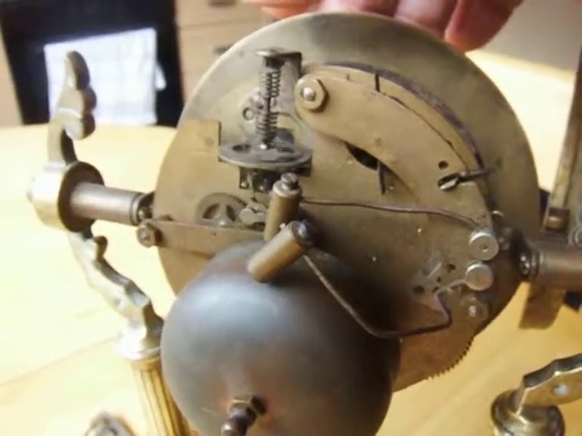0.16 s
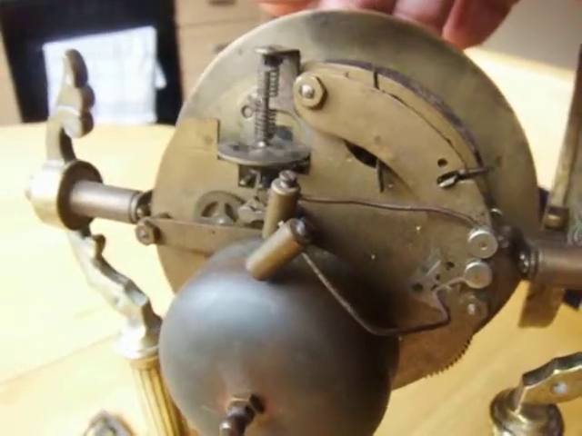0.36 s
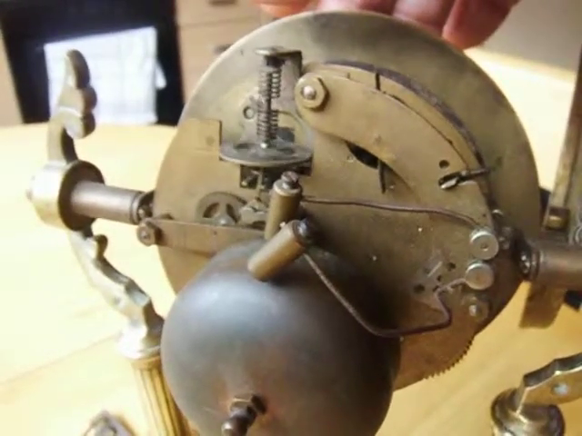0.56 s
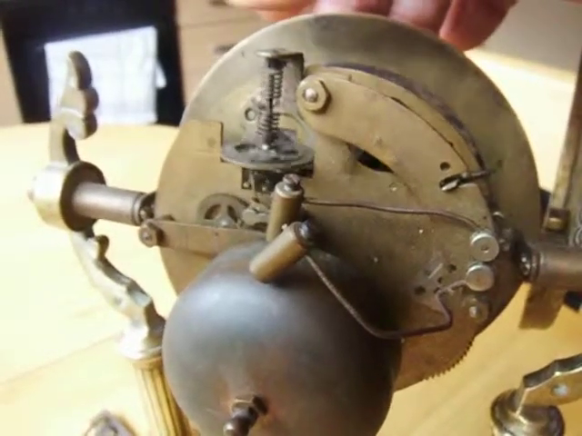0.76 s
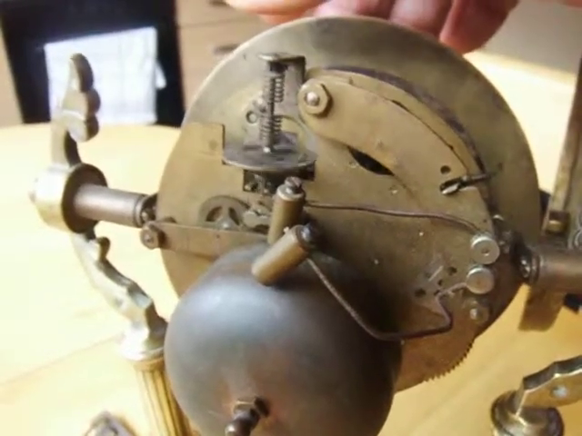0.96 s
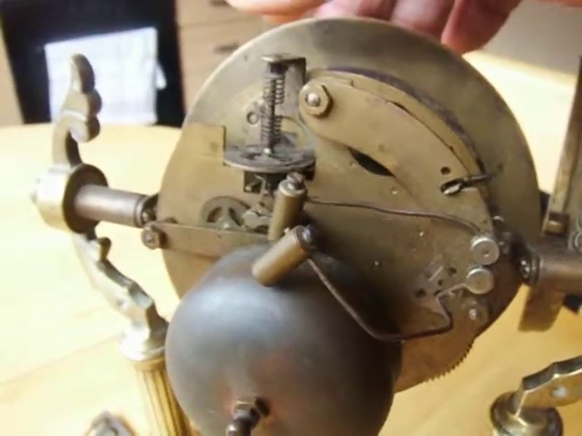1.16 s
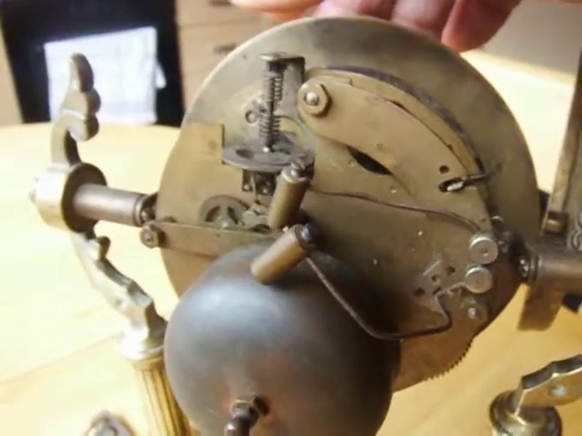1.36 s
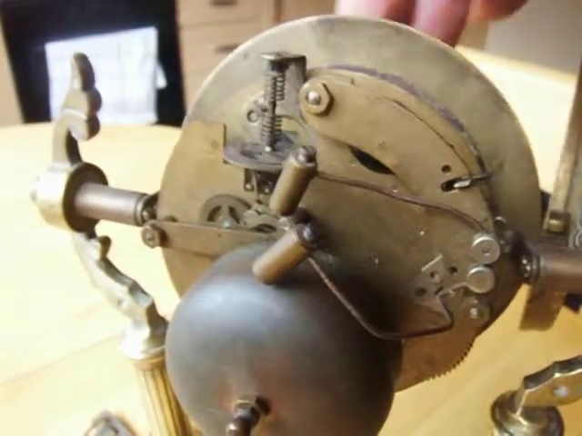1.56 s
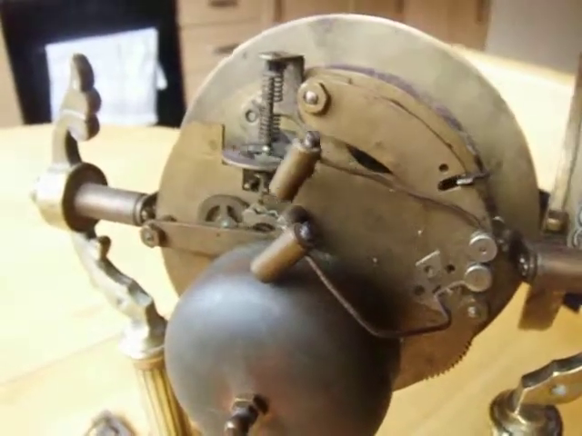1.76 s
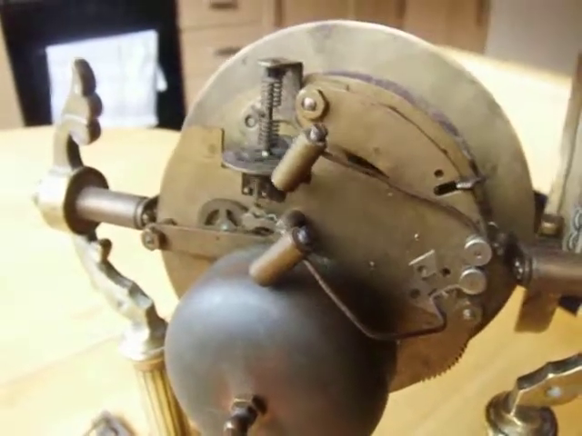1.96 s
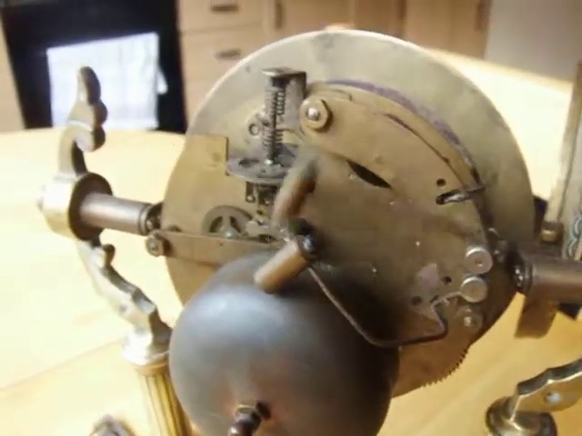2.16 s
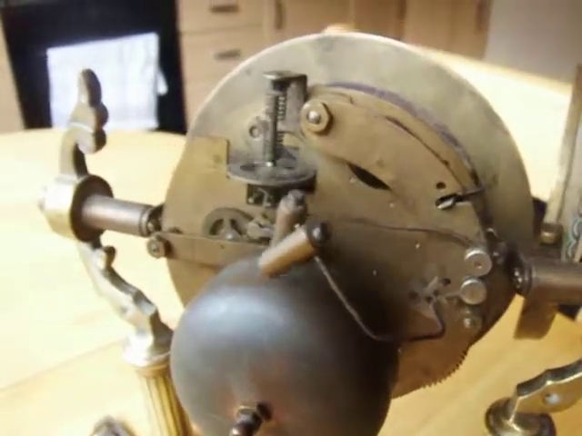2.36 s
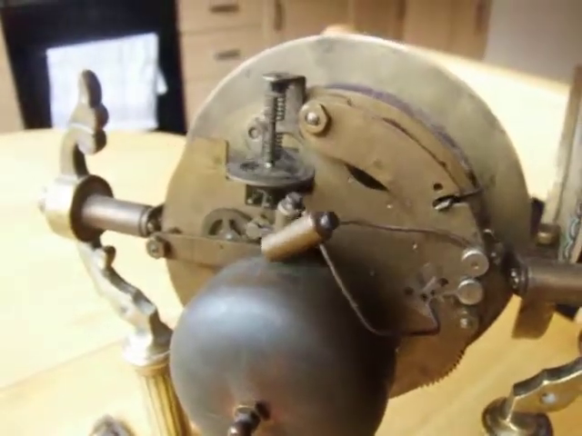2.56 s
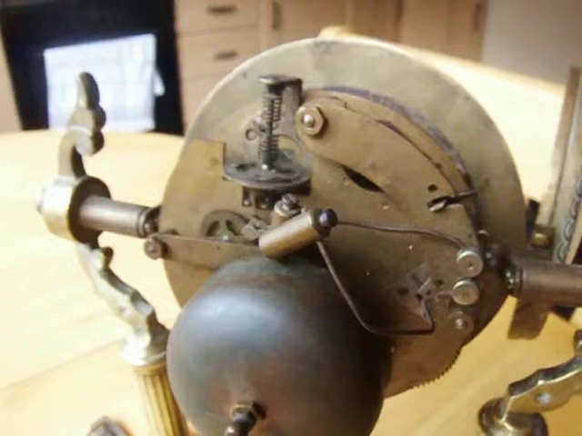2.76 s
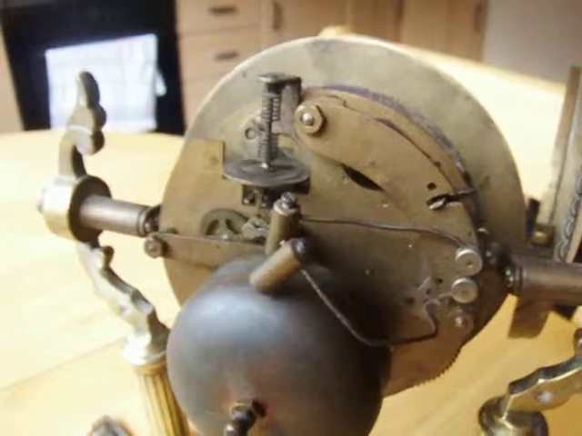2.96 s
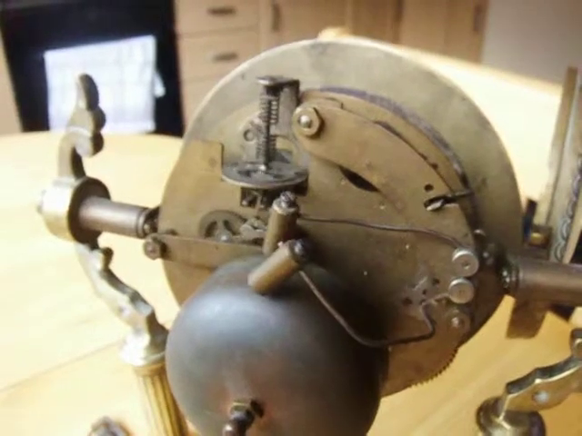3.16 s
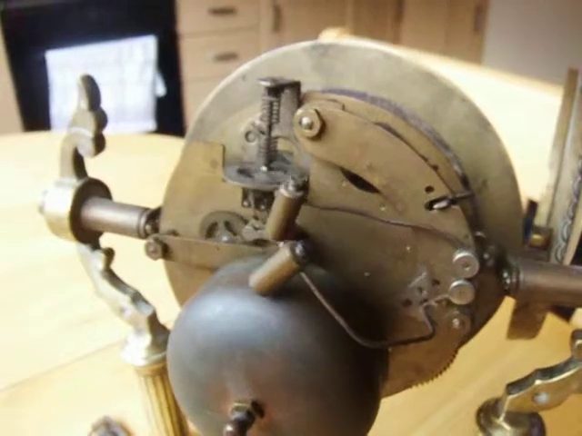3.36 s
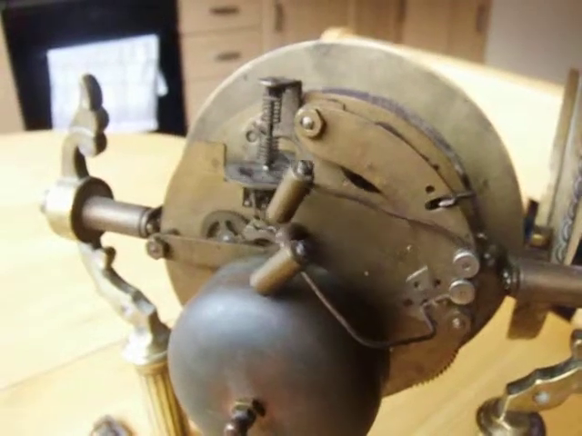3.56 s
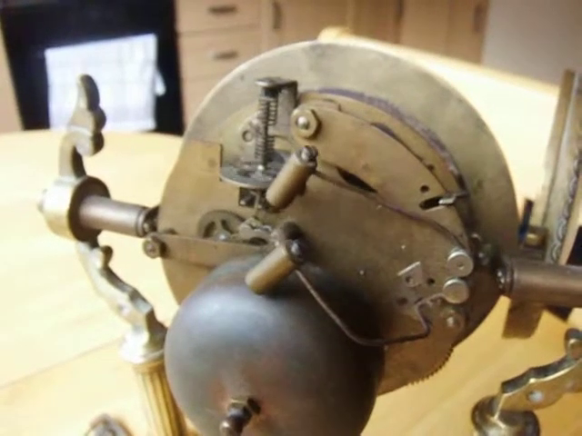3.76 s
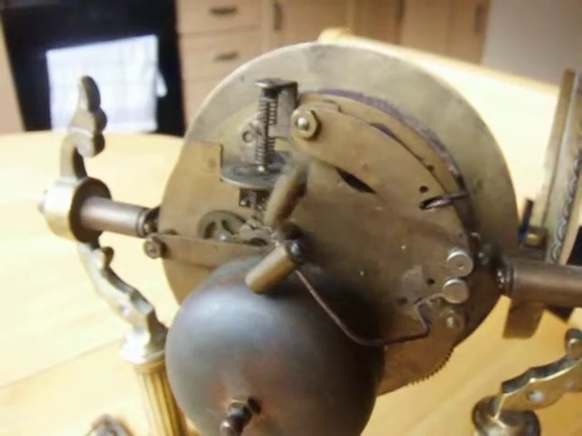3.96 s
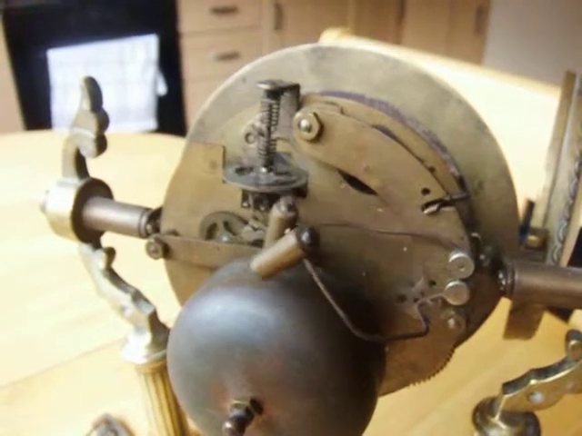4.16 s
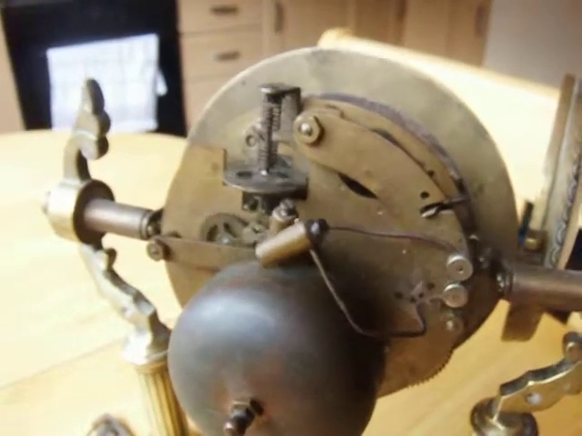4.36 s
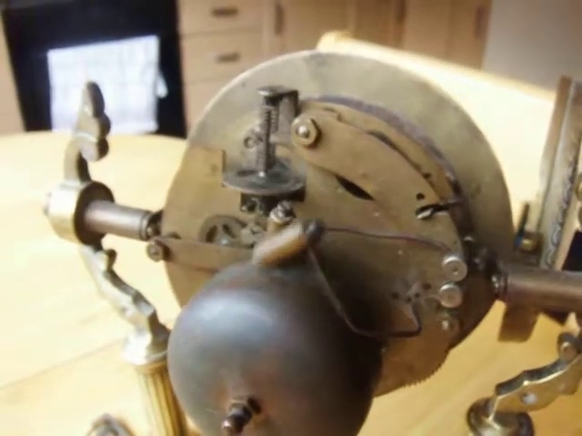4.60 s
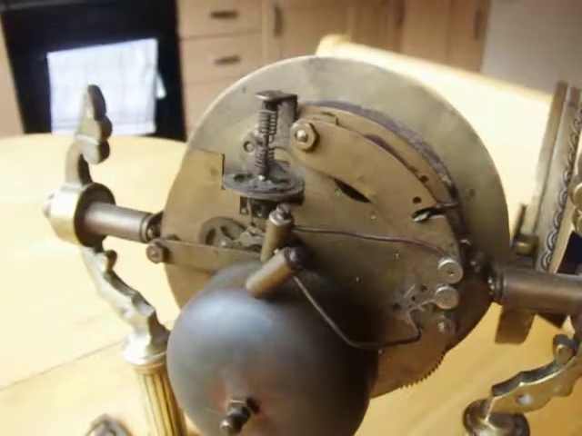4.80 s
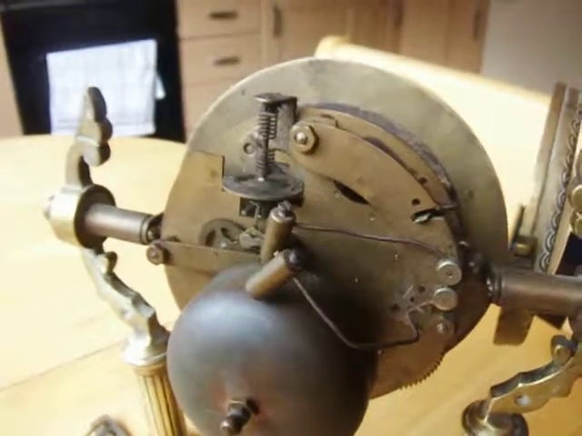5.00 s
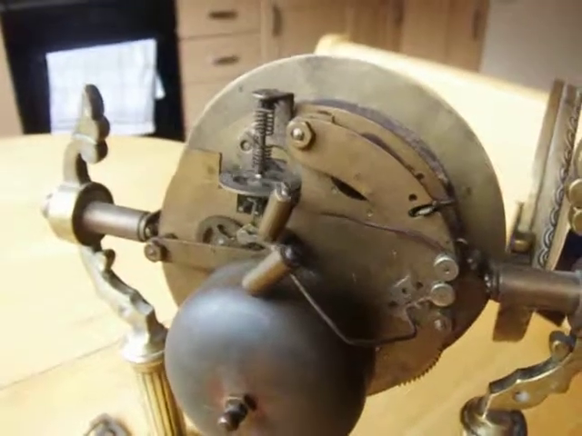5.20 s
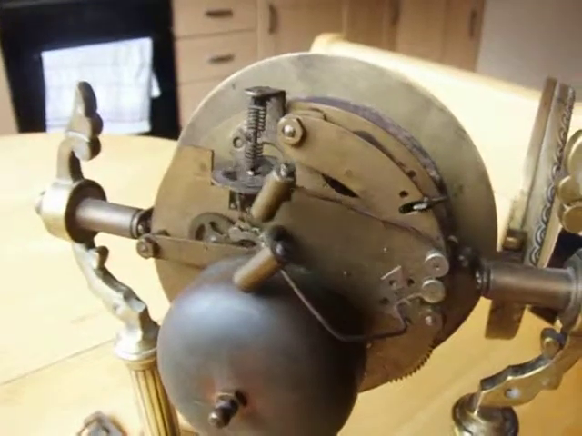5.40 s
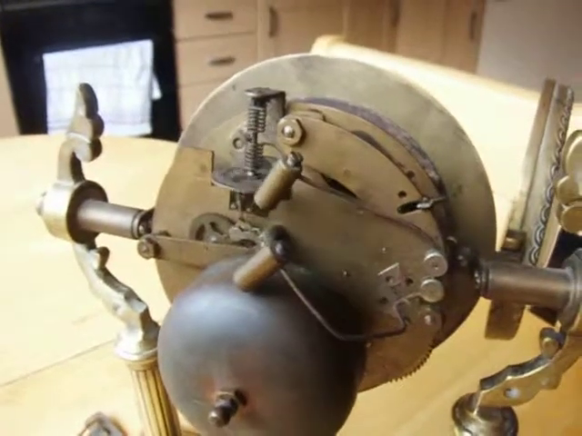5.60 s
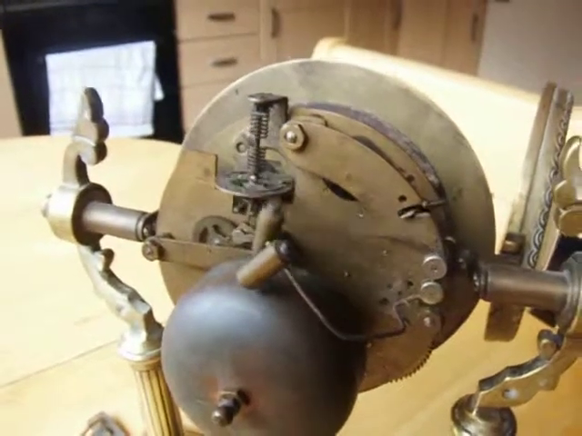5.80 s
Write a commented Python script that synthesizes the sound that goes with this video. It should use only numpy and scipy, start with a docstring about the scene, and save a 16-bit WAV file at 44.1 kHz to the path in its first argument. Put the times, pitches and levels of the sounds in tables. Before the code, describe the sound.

Close up in a small room, a bare clock movement is released: a few dry metallic snaps, then ticking teeth quicken into a steady raspy whirr. From about two seconds two hammers strike two nested bells alternately, five clangs in all, with long beating rings and rattling hammer bounces. A cheap small camera microphone adds low murmur, faint hum, gritty distortion and gain that pumps down after the blows.

```python
"""A room with a striking clock: levers snap, the train is let go and speeds up to a whirr of teeth.
Two hammers strike two nested bells in turn: decaying sine modes, with noise and short knocks at each blow.
The whirr is noise and tiny ticks rung through a plate; each tooth lands with a tick, the outer hammer chatters.
A small camera with a faint hum of its own hears it through gain control and a roughly 8-bit converter
at a quarter of the sample rate."""
import sys
import numpy as np
from scipy import signal
from scipy.fft import rfft, irfft
from scipy.io import wavfile
from scipy.ndimage import uniform_filter1d

SR = 44100
rng = np.random.default_rng(int(sys.argv[2]) if len(sys.argv) > 2 else 0)


def unload_audio(sound):
    """Save the sound as a 16-bit wav file, at the path given as the first command line argument."""
    columns = np.transpose(np.atleast_2d(sound))
    # keep every value between -1 and 1, then stretch to whole-number steps
    steps = np.round(np.clip(columns, -1, 1) * 32767)
    wavfile.write(sys.argv[1], SR, steps.astype(np.int16))


def gain_from_db(level_db):
    """Convert decibel levels to linear amplitude factors (20 dB per decade)."""
    decades = np.asarray(level_db, float) / 20
    return 10 ** decades


N = 257544

# moments of the hammer blows on each bell: (time [s])
OUTER_BLOW_S = [2.2038, 4.0035, 5.7642]
INNER_BLOW_S = [2.8484, 4.6461]
# whirr before the blows shake it, with a lull while the first hammer is lifted: (time [s], level [dB])
WHIRR_LEVEL = [(.9, -58), (.99, -43), (1.4, -45.5), (1.82, -43.5), (1.851, -56.5), (1.91, -49.5),
               (1.93, -45.5), (2.19, -45), (2.3, -35.5), (3.5, -39), (5.84, -39)]
WHIRR_START_S = WHIRR_LEVEL[0][0]


def evened(x):
    """Scales to rms 1."""
    return x / np.sqrt(np.mean(x ** 2) + 1e-20)


def add(mix, s, sound):
    """Mixes a sound in at time s."""
    part = mix[round(s * SR):][:len(sound)]
    part += sound[:len(part)]


def ring(hz, db, t60, seconds, rise):
    """One mode: a sine that builds up with time constant rise (s) and dies by 60 dB in t60 (s)."""
    t = np.arange(round(seconds * SR)) / SR
    return gain_from_db(db - 60 * t / t60) * np.sin(2 * np.pi * hz * t) * (1 - np.exp(-t / rise))


def resonate(x, hz, width):
    """A fixed one-pole resonance of about gain 1 at its centre."""
    pole = np.exp((2j * np.pi * hz - np.pi * width) / SR)
    return 2 * signal.lfilter([1 - abs(pole)], [1, -pole], x).real


def snap(peak_db, hz, t60):
    """A dry click: a dying burst of noise in a wide band, set to its peak."""
    t = np.arange(SR // 20) / SR
    burst = rng.standard_normal(len(t)) * gain_from_db(-60 * t / t60)
    burst = resonate(burst, hz, 0.5 * hz)
    burst = resonate(burst, hz, 0.52 * hz)
    return gain_from_db(peak_db) * burst / abs(burst).max()


def camera_noise():
    """Low murmur of shaped noise that swells a little, with a lumpy low rumble and faint wavering tones."""
    # spectrum of the murmur: (frequency [Hz], relative level [dB])
    murmur_spectrum = [(10, -11), (22, -0.5), (135, -3), (280, -5), (450, -8.5), (900, -13), (2000, -18.5),
                       (5500, -33)]
    # faint tones: (frequency [Hz], rms level [dB])
    hum_tones = [(130, -64), (279.9, -64.5), (387.6, -62), (506.0, -64.5), (635, -69), (807.5, -71.5)]
    murmur_db, rumble_db = -49.5, -54.5
    bin_hz = np.fft.rfftfreq(N, 1 / SR)
    hz, db = np.transpose(murmur_spectrum)
    shape = gain_from_db(np.interp(np.log(bin_hz + 1), np.log(hz), db))
    murmur = irfft(rfft(rng.standard_normal(N)) * shape, N)
    swell_db = evened(uniform_filter1d(rng.standard_normal(N), 4000))
    out = gain_from_db(murmur_db + swell_db) * evened(murmur)
    # a low rumble comes in slow lumps
    lump_db = 7.0 * evened(uniform_filter1d(rng.standard_normal(N), 2500))
    lumps = resonate(rng.standard_normal(N), 12, 28) * gain_from_db(lump_db)
    out += gain_from_db(rumble_db) * evened(lumps)
    for tone_hz, tone_db in hum_tones:
        out += gain_from_db(tone_db) * evened(resonate(rng.standard_normal(N), tone_hz, 2.8))
    return out


def room(x):
    """Adds a short tail of sparse random echoes."""
    t = np.arange(SR // 3) / SR
    echoes = (rng.random(len(t)) < 0.05) * rng.choice([-1, 1], len(t))
    tail = echoes * gain_from_db(-60 * t / 0.13) * (t > 0.003)
    return x + gain_from_db(-12.5) * signal.fftconvolve(x, tail / np.linalg.norm(tail))[:N]


def mechanism():
    """Dry snaps of the levers and the first ticks of the teeth, each with a short ring of modes."""
    # modes: (frequency [Hz], level [dB], t60 [s])
    mechanism_modes = [(1922, -13, 0.22), (2150, 9, 0.02), (2700, 2, .022), (3892, -10, 0.11)]
    # snaps and first ticks: (time [s], peak [dB], centre [Hz], ring against peak [dB])
    mechanism_clicks = [(.326, -23.5, 4340, -30), (0.658, -31.5, 4360, -23), (.667, -34, 2650, -19.5),
                        (.6762, -12.5, 3230, -5.5), (.6915, -21, 2950, -21.5), (.7025, -20, 4680, -10.5),
                        (.7235, -25.5, 2800, -5), (.7555, -31, 3500, -4.5), (0.7683, -30.5, 3850, -6),
                        (.787, -38.5, 2980, -11), (0.8484, -39.5, 4270, -20), (0.943, -29, 4580, -21),
                        (0.996, -23.5, 4010, -19), (3.3853, -16.5, 2750, -42), (3.3871, -28.5, 960, -21)]
    out = np.zeros(N)
    for s, peak_db, centre_hz, ring_db in mechanism_clicks:
        add(out, s, snap(peak_db, centre_hz, 0.022))
        for hz, db, t60 in mechanism_modes:
            add(out, s, ring(hz, peak_db + ring_db + db, t60, 0.12, 0.0025))
    return out


def teeth_passed(t):
    """Under its air brake the train's speed climbs along a tanh towards the top and creeps on."""
    start_s, gather_s = 0.5236, 1.0275
    top_per_s, creep = 44.05, 0.4262  # teeth/s, teeth/s per s
    first_tooth = 0.281  # teeth
    u = np.maximum(t - start_s, 0)
    climb = top_per_s * gather_s * np.log(np.cosh(u / gather_s))
    return first_tooth + climb + creep * u ** 2 / 2


def whirr_db(t):
    """Level curve of the whirr, as every blow shakes the train louder for a while."""
    rise_s, fade_s = 0.068, 0.26
    db = np.interp(t, *np.transpose(WHIRR_LEVEL))
    # strength of the shake (dB), before its build-up and fading
    for blows, shake_db in ((OUTER_BLOW_S, 5.5), (INNER_BLOW_S, 7)):
        for u in np.maximum(t - np.array(blows)[:, None], 0):
            db += shake_db * (1 - np.exp(-u / rise_s)) * np.exp(-u / fade_s)
    return db


def whirr():
    """Every tooth scrapes in: a clump of tiny ticks over a puff of hiss, rung through the plate."""
    # the plate that the teeth rattle: (frequency [Hz], width before widening [Hz], level [dB])
    plate_modes = [(2013, 400, -10), (2764, 400, -5.5), (3500, 500, -13), (3822, 220, -10), (4258, 330, -4),
                   (4530, 450, -10), (5437, 270, -4.5)]
    t = np.arange(N) / SR
    teeth = teeth_passed(t)
    each_tooth_db = 1.6 * rng.standard_normal(int(teeth[-1]) + 2)
    tooth_db = each_tooth_db[np.rint(teeth).astype(int)]
    speed = uniform_filter1d(np.gradient(teeth) * SR, 8000) / 45  # as a share of 45 teeth/s
    mesh = 0.26 + 0.5 * speed ** 3 + (0.5 + 0.5 * np.cos(2 * np.pi * teeth)) ** 2.2
    ticks = (rng.random(N) < 2500 / SR) * rng.choice([-1, 1], N)  # about 2500 a second
    ticks = ticks * gain_from_db(3.0 * np.minimum(rng.exponential(1, N), 4))
    # each tick finds some modes more than others
    reach = gain_from_db(4.0 * rng.standard_normal((len(plate_modes), N)))
    drive = mesh * gain_from_db(tooth_db) * (evened(ticks * reach) + 0.52 * rng.standard_normal(N))
    plate = np.zeros(N)
    for k, (hz, width, db) in enumerate(plate_modes):
        # the lower modes wake up as the train gains speed
        mode_gain = gain_from_db(db - 10.0 * (1.5 - speed) * (hz < 3700))
        rung = resonate(resonate(drive[k], hz, 1.55 * width), hz, 1.55 * width)
        plate += (-1) ** k * mode_gain * rung / np.sqrt(width)
    return evened(plate) * gain_from_db(whirr_db(t)) * (t > WHIRR_START_S)


def tooth_ticks():
    """One sharp tick of chance size as each tooth lands, sinking into the whirr as the train runs on."""
    start_db, spread_db = 12, 4  # mean peak over the whirr at first, and its scatter
    dulling = 1.5  # dB per s
    lead = 0.04  # teeth
    t, out = np.arange(N) / SR, np.zeros(N)
    times = t[1:][np.diff(np.floor(teeth_passed(t) + lead)) > 0]
    times = times[times > WHIRR_START_S]
    tick_db = whirr_db(times) + start_db - dulling * (times - WHIRR_START_S)
    for s, db in zip(times, tick_db):
        add(out, s, snap(db + spread_db * rng.standard_normal(), 4430, 0.025))
    return out


def chatter(count=9):
    """The outer hammer bounces on its stop after each blow: wide dry ticks, ever closer and mostly softer."""
    # first gap after each blow: (gap [s])
    first_gaps = [.057, .0545, .055]
    # low and high band of a bounce: (centre [Hz])
    bounce_bands = (2400, 4700)
    peak_db, loss_db, spread_db = -16, 1.1, 1.5  # first bounce per band, loss per bounce, scatter
    shrink = 0.87  # each gap against the one before
    out = np.zeros(N)
    for s, gap in zip(OUTER_BLOW_S, first_gaps):
        times = s + np.cumsum(gap * shrink ** np.arange(count))
        for k, at in enumerate(times):
            db = peak_db - loss_db * k + spread_db * rng.standard_normal()
            add(out, at, sum(snap(db, hz, 0.018) for hz in bounce_bands))
    return out


def bell(pitches, modes, knock_pitches, knock_modes, times, blows, crack_db):
    """Each blow starts the bell's long modes, a short knock of modes and a crack of noise."""
    rings, knocks = np.zeros((2, N))
    # the knock is stifled when the hammer falls back: after 41 ms, time constant 8.7 ms
    stifled = np.exp(-np.maximum(np.arange(SR // 2) / SR - 0.041, 0) / 0.0087)
    t = np.arange(SR // 10) / SR
    for s, (knock_db, contact_ms, low_db, high_db) in zip(times, blows):
        for hz, (db, t60, side) in zip(pitches, modes):
            blow_db = high_db if hz > 4000 else low_db
            add(rings, s, np.sign(side) * ring(hz, db + blow_db, t60, N / SR, 0.011))
        # neighbours start in opposition, so close ones swell after the blow
        for k, (hz, (db, t60)) in enumerate(zip(knock_pitches, knock_modes)):
            mode = ring(hz, db + knock_db, t60, 0.5, contact_ms / 1000)
            add(knocks, s, (-1) ** k * stifled * mode)
        crack = gain_from_db(knock_db + crack_db - 60 * t / 0.16) * rng.standard_normal(len(t))
        add(knocks, s, crack * stifled[:len(t)] * (1 - np.exp(-1000 * t / contact_ms)))
    return rings, knocks


def inner_bell():
    """The inner bell's ring and knock; close modes of opposite side swing against each other and beat."""
    # long-ringing modes: (frequency [Hz])
    ring_pitches = [1615.75, 1683.0, 3296.6, 4352.1, 4343.1, 4329.3]
    # the same modes: (level [dB], t60 [s], side [+-1])
    ring_modes = [(0, 3.4, 1), (-26.5, 2, 1), (-17.5, 1.2, 1), (0.5, 1.9, 1), (-11, 2.5, -1),
                  (-26, 0.92, 1)]
    # knock through plate and table: (frequency [Hz])
    knock_pitches = [242, 900, 2008, 2770, 4900]
    # the same knock modes: (level [dB], t60 [s])
    knock_modes = [(-26, 0.058), (-22, 0.006), (-6, 0.018), (-0.5, 0.043), (5, 0.01)]
    # blows: (knock [dB], contact [ms], low ring [dB], high ring [dB])
    hammer_blows = [(1, 0.35, -18.5, -8), (0.16, 0.38, -18, -12.5)]
    return bell(ring_pitches, ring_modes, knock_pitches, knock_modes, INNER_BLOW_S, hammer_blows, -14.5)


def outer_bell():
    """The outer bell's ring and knock, struck first; its close modes of opposite side beat as well."""
    # long-ringing modes: (frequency [Hz])
    ring_pitches = [1582.6, 1648.3, 3463.1, 4256.6, 4247.1]
    # the same modes: (level [dB], t60 [s], side [+-1])
    ring_modes = [(-4, 3.2, -1), (1, 3.5, 1), (-7, 1, 1), (1.5, 2.1, 1), (-27, 0.85, -1)]
    # knock through plate and table: (frequency [Hz])
    knock_pitches = [55, 430, 468, 851, 1249, 2003, 2541, 2960, 3360, 3779, 4694, 5033]
    # the same knock modes: (level [dB], t60 [s])
    knock_modes = [(-8.5, 0.17), (-10, 0.32), (-6.5, 0.15), (-7.5, 0.028), (-0.5, 0.08), (-13, 0.059),
                   (-1, 0.07), (0, 0.049), (-1, 0.22), (-1.5, 0.17), (-7.5, 0.073), (1, 0.078)]
    # blows: (knock [dB], contact [ms], low ring [dB], high ring [dB])
    hammer_blows = [(-9.5, 2.2, -17.5, -1), (-3, 1.1, -16, -1.5), (-5, 0.96, -15, -1.5)]
    return bell(ring_pitches, ring_modes, knock_pitches, knock_modes, OUTER_BLOW_S, hammer_blows, 2.3)


def dips():
    """Gain of the clock's sound: just after each blow but the first it drops a step, later jumps back."""
    # steps: (drop [s], return [s])
    dip_times = [(2.8495, 3.3552), (4.0055, 4.5335), (4.6472, 5.1565), (5.7662, 6.3)]
    t = np.arange(N) / SR
    return gain_from_db(sum(-9.5 * np.clip((t - a) / 0.0018, 0, 1) * (t < b) for a, b in dip_times))


def scene():
    """The clock in its room, over the camera's noise."""
    noise = camera_noise()
    inner, inner_knock = inner_bell()
    outer, outer_knock = outer_bell()
    train = mechanism() + whirr() + tooth_ticks()
    clock = outer + inner + room(train + chatter() + inner_knock + outer_knock)
    return (clock * dips() + noise)[None]


def roll_off(x):
    """The treble ends steeply here."""
    return signal.sosfilt(signal.butter(12, 16660, fs=SR, output="sos"), x)


def record(dry):
    """Gain control, a roughly 8-bit converter at a quarter rate, then smoothing whose overshoot clips."""
    full_scale, levels = np.sqrt(0.5), 2 ** 7  # levels on each side of zero
    power = signal.lfilter([0.004], [1, -0.996], dry[0] ** 2)
    power_db = 10 * np.log10(power + 1e-12)
    fall = np.arange(N) * 18.0 / SR  # the held peak recovers at 18 dB a second
    held_db = np.maximum.accumulate(power_db + fall) - fall
    over_db = np.maximum(held_db + 35.0, 0)  # above -35 dB
    ducked = dry[0] / gain_from_db(0.32 * signal.lfilter([0.006], [1, -0.994], over_db))
    slow = signal.resample_poly(ducked, 1, 4)
    # rounding down leaves a small offset
    steps = np.clip(np.floor(slow / full_scale * levels), -levels, levels + 2)
    smooth = signal.firwin(129, 5500, window=("kaiser", 9), fs=SR)
    back = signal.resample_poly(steps * full_scale / levels, 4, 1, window=smooth)[:N]
    finished = np.clip(back, -full_scale, full_scale)[None]
    return roll_off(finished)


dry = scene()
out = record(dry)
unload_audio(out)
```